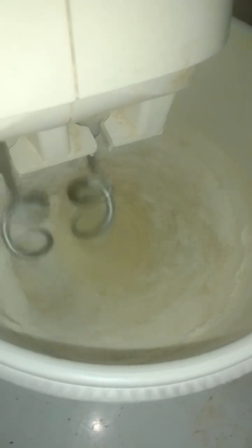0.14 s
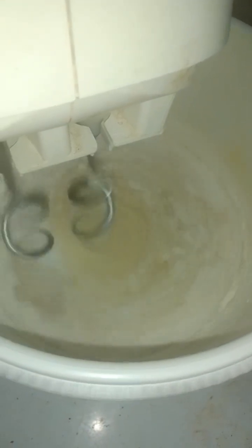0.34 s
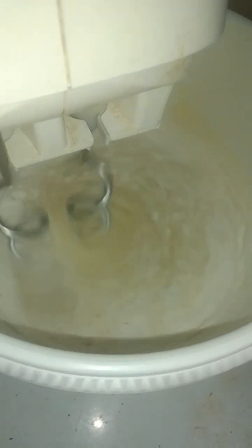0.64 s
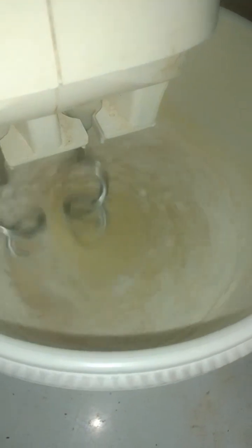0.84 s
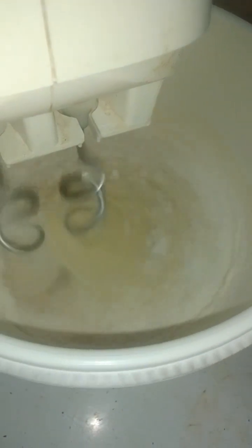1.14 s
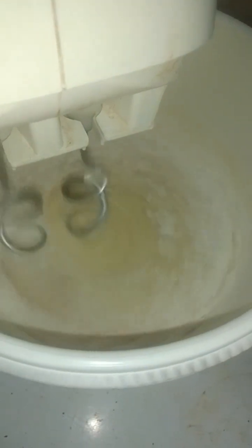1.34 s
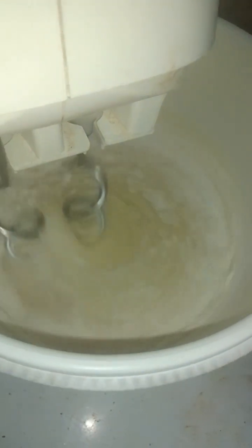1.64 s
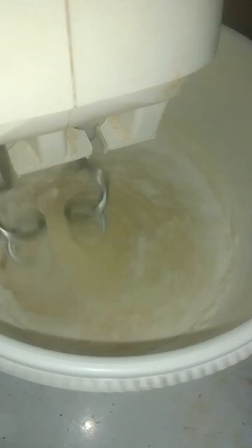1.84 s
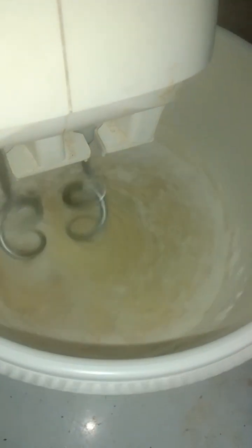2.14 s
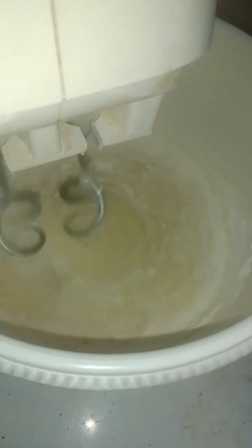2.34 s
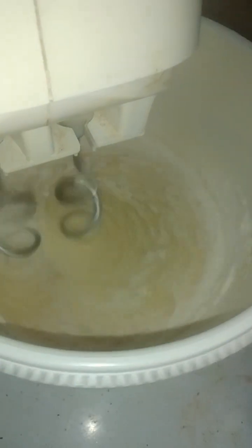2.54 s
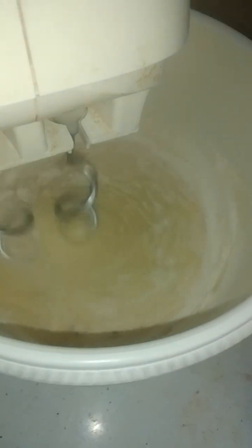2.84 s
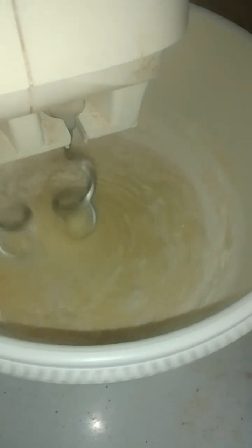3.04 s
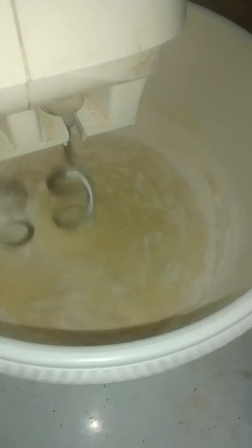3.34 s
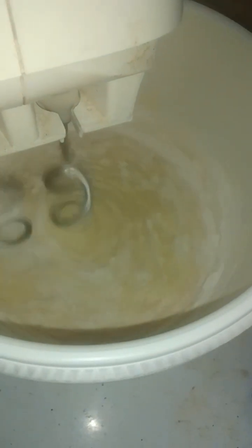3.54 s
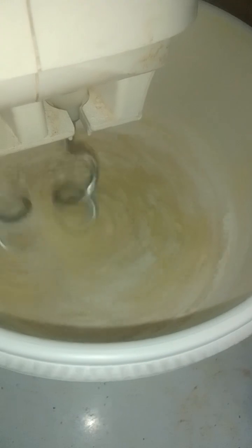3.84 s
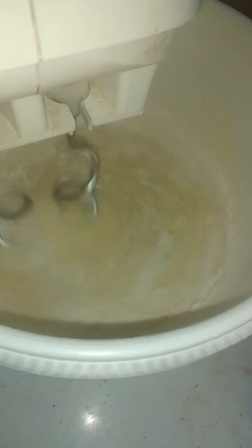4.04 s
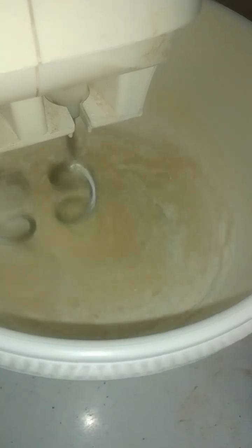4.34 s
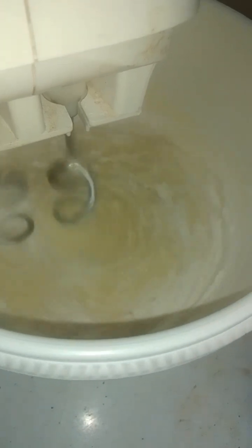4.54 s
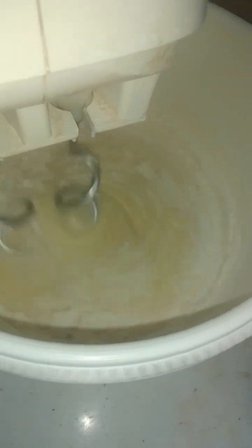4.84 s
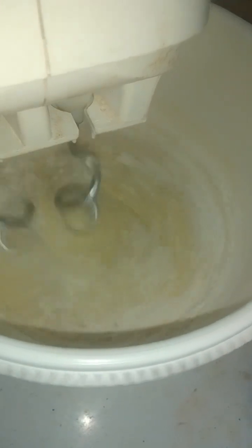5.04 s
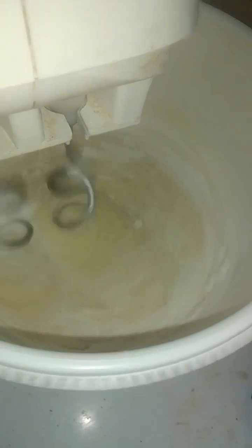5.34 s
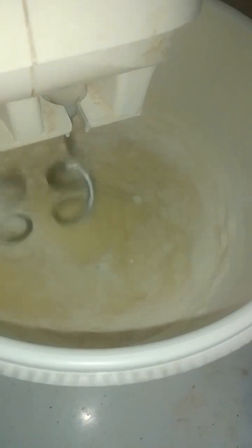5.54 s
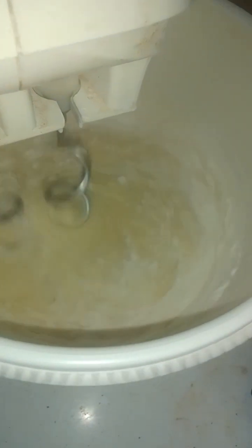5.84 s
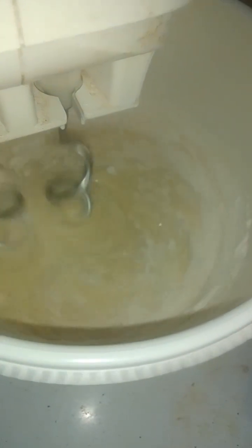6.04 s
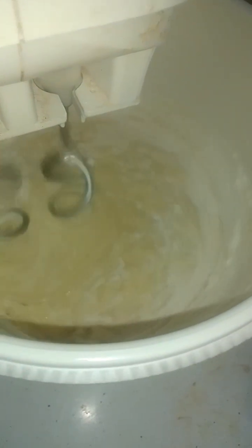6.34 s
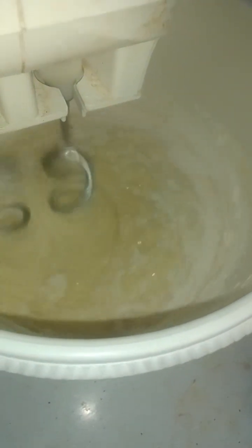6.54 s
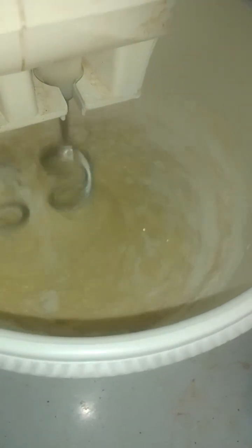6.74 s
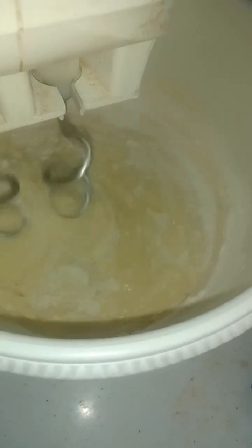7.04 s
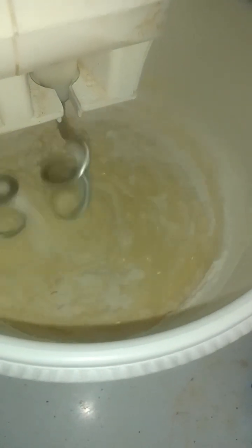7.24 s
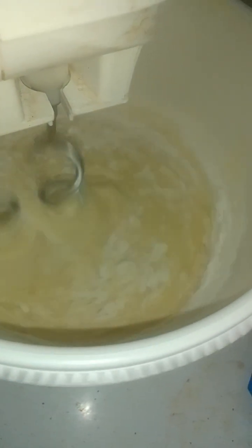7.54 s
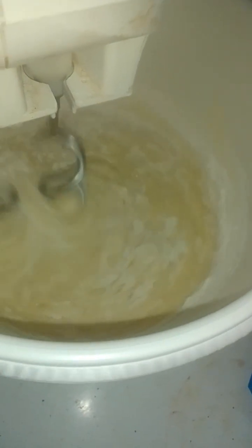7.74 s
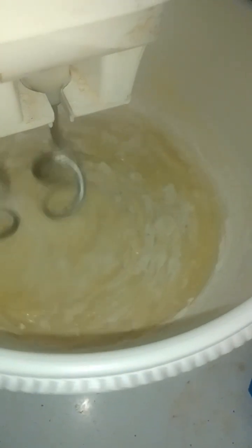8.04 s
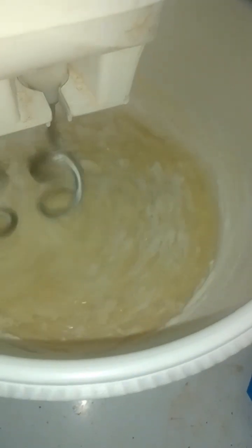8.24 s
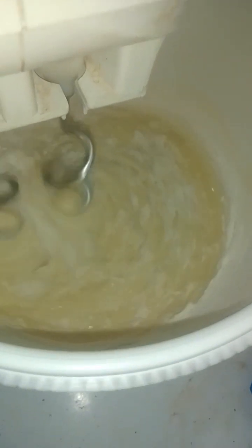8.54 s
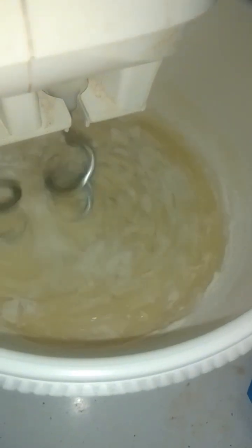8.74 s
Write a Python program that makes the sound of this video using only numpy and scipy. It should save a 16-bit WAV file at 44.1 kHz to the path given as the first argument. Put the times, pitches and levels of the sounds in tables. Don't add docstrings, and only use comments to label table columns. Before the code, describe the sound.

A kitchen stand mixer runs without pause, very close to the microphone. A steady mid-low motor hum and higher gear whine sit inside a dense, rough plastic-housing whirr with airy fan noise. The pitch wavers slightly, sagging a little after about six seconds, when a short cluster of wet glugs bubbles up in the batter, followed later by a brief hook scrape on the plastic bowl.

```python
import sys
import numpy as np
from scipy import signal
from scipy.fft import rfft, irfft, next_fast_len
from scipy.io import wavfile
from scipy.ndimage import uniform_filter1d, map_coordinates

SR = 44100
rng = np.random.default_rng(int(sys.argv[2]) if len(sys.argv) > 2 else 0)


def natural_amplitude(level_db):
    exponent = np.asarray(level_db, float) / 20
    return 10 ** exponent


def unload_audio(sound):
    columns = np.transpose(np.atleast_2d(sound))
    steps = np.round(np.clip(columns, -1, 1) * 32767)
    wavfile.write(sys.argv[1], SR, steps.astype(np.int16))


N = 392490
T_S = np.arange(N) / SR
GEAR_RATIO = 21.49
MAINS_PULL_HZ = 100.2

# (time [s], share of the colour change)
AWAY = [(0, -0.26), (5.8, -0.15), (6.7, 0.8), (8.9, 0.74)]


def unit(x):
    return x / np.sqrt(np.mean(x ** 2) + 1e-20)


def curves(rows):
    s, *cols = np.transpose(rows)
    return [np.interp(T_S, s, c) for c in cols]


def wobble(rate_hz):
    steps = np.arange(0, N + 64, 64)
    knots = rng.standard_normal(int(N * rate_hz / SR) + 4)
    return np.interp(np.arange(N), steps, map_coordinates(knots, [steps * rate_hz / SR]))


def filtered(x, response):
    m = next_fast_len(N + 8192)
    return irfft(rfft(x, m) * response(np.fft.rfftfreq(m, 1 / SR)), m)[..., :N]


def rush(spectrum, patchy_db, wide_bins, slow_frames, modes=()):
    z = signal.stft(rng.standard_normal(N), nperseg=512)[2]
    field = uniform_filter1d(rng.standard_normal(z.shape), int(wide_bins), 0)
    field = uniform_filter1d(field, int(slow_frames), 1)
    noise = signal.istft(z * natural_amplitude(patchy_db * unit(field)), nperseg=512)[1][:N]
    f, level_db = np.transpose(spectrum)

    def response(hz):
        bumps_db = sum(db / (1 + (2 * (hz - c) / w) ** 2) for c, w, db in modes)
        return natural_amplitude(np.interp(np.log(hz + 1), np.log(f + 1), level_db, -120, -120) + bumps_db)

    return unit(filtered(noise, response))


def lines(orders, levels_db, shaft, unsteady_db):
    mains = MAINS_PULL_HZ * T_S
    out = np.zeros(N)
    for (k, h, m), db in zip(orders, levels_db):
        lag = (h < -1 or m < 0) / 4
        turns = (k + h / GEAR_RATIO) * shaft + m * mains - lag
        out += natural_amplitude(db + unsteady_db * wobble(3.04)) * np.cos(2 * np.pi * turns)
    return np.sqrt(2) * out


def unbalance(shaft):
    orders = [(1, h, 0) for h in range(-4, 6)] + [(1, 0, 1), (1, 0, -1)]
    levels_db = [-26, -15, -13.5, -21, 0, -11.5, -13, -19, -19, -21, -17, -24]
    bowl_turn_s, first_press_s = 1.747, 0.58
    press = 2 * np.pi * (T_S - first_press_s) / bowl_turn_s
    shake_db = -30.5 + 0.5 * np.cos(2 * press) + 0.85 * np.cos(press)
    return natural_amplitude(shake_db) * lines(orders, levels_db, shaft, 0.5)


def gear_whine(shaft, faster_hz):
    orders = [(5, 0, 0), (5, -1, 0), (5, 1, 0), (5, 0, -1)]
    levels_db = [0, -8, -10.5, -6.5]
    settle_s, settle_db, db_per_hz, shaded_db = 0.39, 5, 0.18, 3.5
    whine_db = -34 + settle_db * np.exp(-T_S / settle_s) + db_per_hz * faster_hz
    whine_db = whine_db - shaded_db * curves(AWAY)[0]
    return natural_amplitude(whine_db) * lines(orders, levels_db, shaft, 1.9)


def hum(shaft):
    orders = [(0, 2, 0), (0, 3, 0), (0, 5, 0), (0, 0, 1), (0, 0, 4), (2, 0, 0), (2, 1, 0), (2, -1, 0),
              (2, -3, 0), (2, 3, 0), (3, 0, 0), (3, 0, -1), (4, -1, 0), (4, 0, 0)]
    levels_db = [-70.5, -64.5, -70.5, -63, -54.5, -46, -41, -46, -53, -52, -38, -52.5, -46, -40.5]
    upper = [(k, 0, 0) for k in (6, 7, 8, 9, 10, 12, 15, 21, 22, 23, 24)]
    upper_db = [-49, -55.5, -60.5, -50, -55.5, -71, -59.5, -72.5, -75, -82, -78]
    ripple = [(3, 0, 1), (4, 0, -1), (6, 0, 1), (8, 0, -1)]
    ripple_db = [-44, -45, -50, -57]
    return lines(orders + upper + ripple, levels_db + upper_db + ripple_db, shaft, 2)


def teeth(shaft):
    orders = [2, 3, 4, 5, 7]
    levels_db = [-43, -42, -38, -42, -46]
    angle = np.arange(257) / 256
    out = np.zeros(N)
    for k, db in zip(orders, levels_db):
        wear = unit(sum(rng.normal() * np.cos(2 * np.pi * (h * angle + rng.random())) for h in range(2, 10)))
        shaking = np.interp(shaft / GEAR_RATIO % 1, angle, wear)
        out += natural_amplitude(db) * shaking * np.sqrt(2) * np.cos(2 * np.pi * k * shaft)
    return out


def housing_noise(hook, pull):
    # (frequency [Hz], level [dB per Hz])
    spectrum = [(20, -32), (118, -23.5), (224, -13.5), (260, -13.5), (330, -8), (445, -15.5), (646, -13.5),
                (817, -12.5), (1060, -7), (1650, -8.5), (1900, -15), (2400, -15.5), (2650, -28),
                (3000, -58)]
    # (frequency [Hz], width [Hz], level [dB])
    panels = [(315, 52, -4.5), (348, 55, 3), (418, 39, 5.5), (659, 71, 8), (955, 7.9, 0.5), (1064, 26, 2.5),
              (1284, 34, 1.5), (1348, 99, 5), (1837, 91, 3.5), (2205, 260, 6)]
    load_db = 0.44 * wobble(2.5)
    throb_db = 0.48 * np.cos(hook + 2.0) + 0.33 * np.cos(pull)
    return natural_amplitude(-22.5 + load_db + throb_db) * rush(spectrum, 0.93, 3, 7, panels)


def fan_noise(hook, faster_hz):
    # (frequency [Hz], level [dB per Hz])
    spectrum = [(2300, -43.5), (2600, -1), (2820, 1), (3480, -2.5), (4170, -7.5), (4850, -6.5),
                (5050, -14.5), (5500, -10), (5850, -34), (6500, -29), (6750, -16.5), (7150, -21),
                (7300, -28.5), (7800, -25), (8000, -35), (8300, -44)]
    throb_db = 0.45 * np.cos(hook + 2.2) + 0.35 * np.cos(2 * hook)
    return natural_amplitude(-37.5 + 0.08 * faster_hz + throb_db) * rush(spectrum, 1.2, 5, 150)


def brushes(shaft, faster_hz, pull):
    # (time [s], half-length [s], commutator level [dB], hiss level [dB])
    flares = [(0, .15, 17, 2), (.58, .12, 7, -0.3), (1.178, .1, 11, -1.5), (2.249, .25, 1, 6),
              (3.295, .18, 9, -3), (5.55, .28, 10, -1), (6.5, .1, 12, 2), (6.883, 0.13, 12, -0.5),
              (7.503, 0.28, 12, 0.5), (7.946, .25, 18, 4.5), (8.7, .3, 10, 2.5)]
    # (frequency [Hz], level [dB per Hz])
    low_spectrum = [(9000, -57.5), (9650, -25), (10400, -25.5), (11000, -19.5), (11200, -22.5),
                    (11500, -17.5), (11850, -23.5), (12000, -14), (12400, -27.5), (13200, -25.5),
                    (13800, -13), (13950, -20), (14250, 0.5), (14600, -17)]
    # (frequency [Hz], level [dB per Hz])
    high_spectrum = [(14400, -41.5), (14650, -17.5), (14870, -10), (15050, -13.5), (15300, -5), (15500, -1),
                     (15720, 2.5), (15800, -45)]
    bars = [(36, 0, 0), (34, 0, 0), (29, 0, 0)]
    bars_db, hiss_db = np.zeros(N), np.zeros(N)
    for s, half_s, bar_db, spark_db in flares:
        swell = np.exp(-((T_S - s) / half_s) ** 2)
        bars_db += bar_db * swell
        hiss_db += spark_db * swell
    ticks = natural_amplitude(-89.5 + bars_db) * lines(bars, [-1, -15, -18], shaft, 2.5)
    sparks = natural_amplitude(0.7 * np.cos(pull) + 1.2 * wobble(30))
    low = natural_amplitude(-70.5 + 0.6 * faster_hz) * rush(low_spectrum, 2, 2, 100)
    high = natural_amplitude(-69 + hiss_db) * rush(high_spectrum, 2.2, 4.3, 100)
    return ticks + sparks * (low + high)


def mixer():
    # (time [s], shaft speed [Hz])
    motor = [(0, 323.4), (.3, 324.3), (.75, 324.5), (1.1, 322.7), (1.5, 321.6), (1.9, 321.9), (2.25, 320.8),
             (2.65, 321.3), (3.3, 319.9), (4.4, 324.4), (4.65, 323.5), (5.7, 322.9), (6.35, 320.6),
             (6.9, 316.0), (7.75, 316.7), (8.9, 316.0)]
    shaft_hz, = curves(motor)
    faster_hz = shaft_hz - 320
    shaft = np.cumsum(shaft_hz * (1 + 0.0004 * wobble(14))) / SR
    hook = 2 * np.pi * shaft / GEAR_RATIO
    pull = 2 * np.pi * MAINS_PULL_HZ * T_S
    tones = unbalance(shaft) + gear_whine(shaft, faster_hz) + hum(shaft) + teeth(shaft)
    noise = housing_noise(hook, pull) + fan_noise(hook, faster_hz)
    return tones + noise + brushes(shaft, faster_hz, pull)


def batter():
    # (time [s], peak level [dB], start frequency [Hz], rise [share], t60 [s])
    glugs = [
        (6.415, -19.5, 196.5, 0.31, 0.2),
        (6.455, -4.5, 253, 0.047, 0.058),
        (6.495, -16.5, 235, 0.04, 0.13),
        (6.535, -26, 190, .05, 0.14),
        (6.58, -25.5, 143.5, .1, 0.14),
    ]
    out, t = np.zeros(N), np.arange(SR // 4) / SR
    for s, db, hz, rise, t60_s in glugs:
        turns = np.cumsum(hz * (1 + rise * np.minimum(t / 0.073, 1))) / SR
        envelope = natural_amplitude(db - 60 * t / t60_s) * (1 - np.exp(-t / 0.02))
        out[round(s * SR):][:len(t)] += envelope * 2 * np.sin(2 * np.pi * turns)
    return out


def bowl():
    # (time [s], peak level [dB], length [s])
    scrapes = [
        (7.79, -17, .056),
        (7.85, -19.5, .035),
        (6.49, -25, .05),
    ]
    # (frequency [Hz], width [Hz], level [dB])
    modes = [(110, 120, -19), (750, 200, -4), (1120, 200, 0), (1275, 70, 4), (1612, 60, 3), (2100, 400, -9),
             (3600, 1500, -17)]

    def ring(f):
        return sum((-1) ** k * natural_amplitude(db) * 1j * f * w / (c * c - f * f + 1j * f * w)
                   for k, (c, w, db) in enumerate(modes))

    stroke = np.zeros(N)
    for s, db, length_s in scrapes:
        stroke += natural_amplitude(db) * np.sin(np.pi * np.clip((T_S - s) / length_s, 0, 1) ** 0.83)
    rub = unit(filtered(rng.standard_normal(N), ring))
    return filtered(stroke * rub, lambda hz: 1 / (1 + (hz / 3000) ** 6) + 0.012)


def scene():
    return (mixer() + batter() + bowl())[None]


def roll_off(x):
    return signal.sosfilt(signal.butter(12, 16620, fs=SR, output="sos"), x)


def record(dry):
    # (time [s], first null [Hz], second null [Hz])
    port = [(0, 4560, 6140), (2.2, 4500, 6250), (4.5, 4610, 6100), (6.7, 4580, 6480), (8.9, 4630, 6600)]
    # (frequency [Hz], level [dB])
    tilt = [(800, 1), (950, 0.5), (1050, 0), (1265, 2), (1340, -2), (1420, -1), (1600, -0.5), (2200, 0.5),
            (3200, -0.5), (4500, -1), (6300, -0.5), (7500, -3), (9200, 11), (10500, 0.5)]
    # (frequency [Hz], level [dB])
    gate = [(3000, -130), (4500, -87), (5200, -110), (6200, -92), (7300, -92), (8200, -95), (9200, -99),
            (10000, -104), (12000, -101), (13000, -104), (14700, -94), (15500, -100)]
    hz, t, z = signal.stft(dry, SR, nperseg=1024)
    s, first_hz, second_hz = np.transpose(port)

    def null(centre_hz, width_hz, depth_db):
        off_hz = hz[:, None] - np.interp(t, s, centre_hz)
        return natural_amplitude(-depth_db / (1 + (off_hz / width_hz) ** 2))

    z = z * null(first_hz, 96, 33) * null(second_hz, 90, 14)
    z = z * natural_amplitude(np.outer(np.interp(hz, *np.transpose(tilt)), np.interp(t, *np.transpose(AWAY))))

    power = uniform_filter1d(uniform_filter1d(np.abs(z) ** 2, size=2, axis=2), size=6, axis=1)
    power = power[:, 3::6, ::2].repeat(6, 1).repeat(2, 2)[:, :510, :len(t)]
    vary_db = 4 * unit(uniform_filter1d(rng.standard_normal((85, len(t) // 2 + 1)), 3, 1))
    vary_db = vary_db.repeat(6, 0).repeat(2, 1)[:, :len(t)]
    margin_db = 3
    gate_db = np.interp(hz[:510], *np.transpose(gate))[:, None] + vary_db + margin_db
    z = z[:, :510] * (power > natural_amplitude(gate_db) ** 2)
    z = np.pad(z, ((0, 0), (0, 3), (0, 0)))
    heard = signal.istft(z, SR, nperseg=1024)[1][:, :N]

    edges = np.minimum(1, np.minimum(np.arange(N), N - np.arange(N)) / 100)
    offset, top_hz = 0.0065, 15740
    return roll_off(filtered((heard + offset) * edges, lambda f: f < top_hz))


dry = scene()
out = record(dry)
unload_audio(out)
```